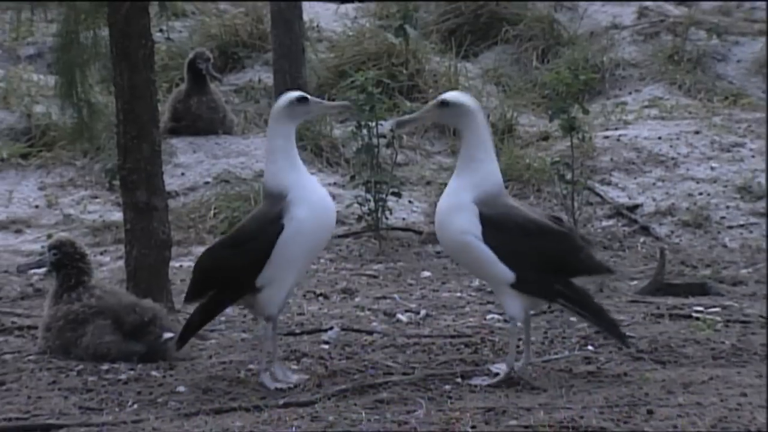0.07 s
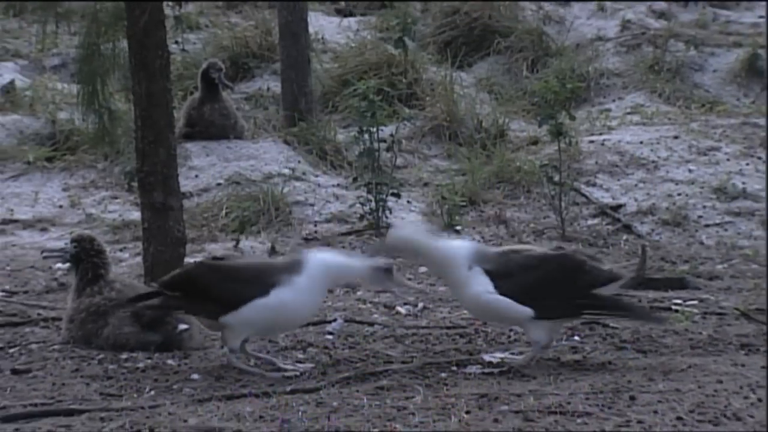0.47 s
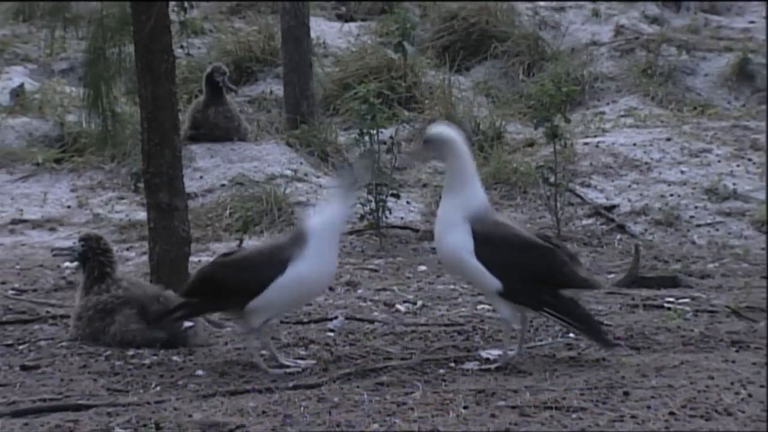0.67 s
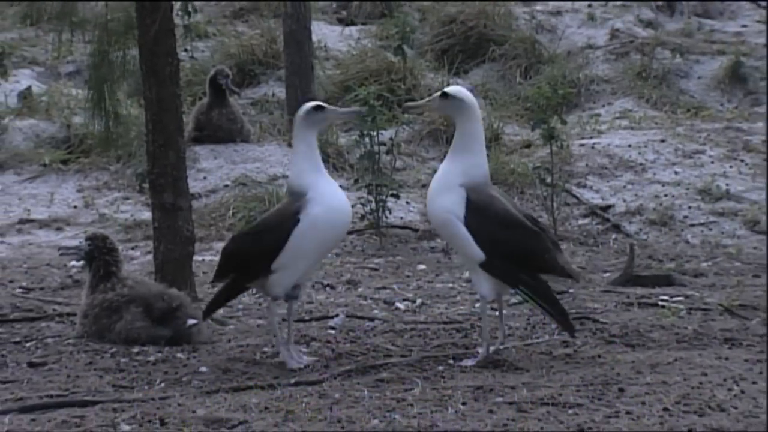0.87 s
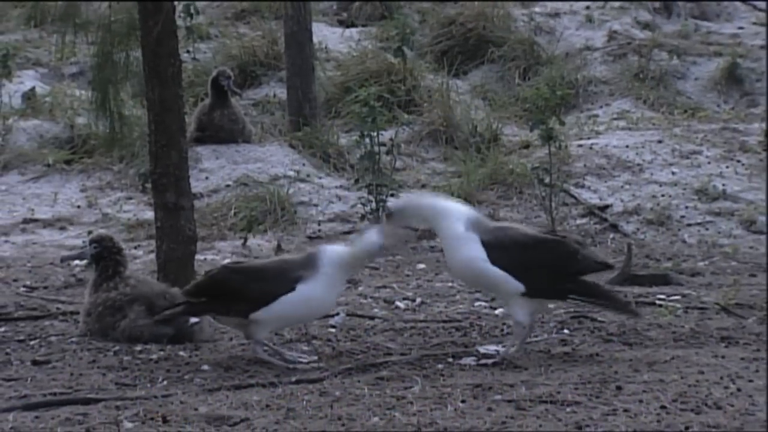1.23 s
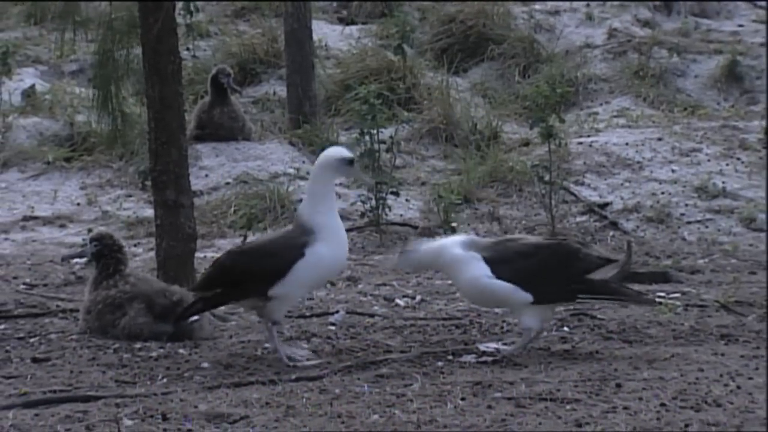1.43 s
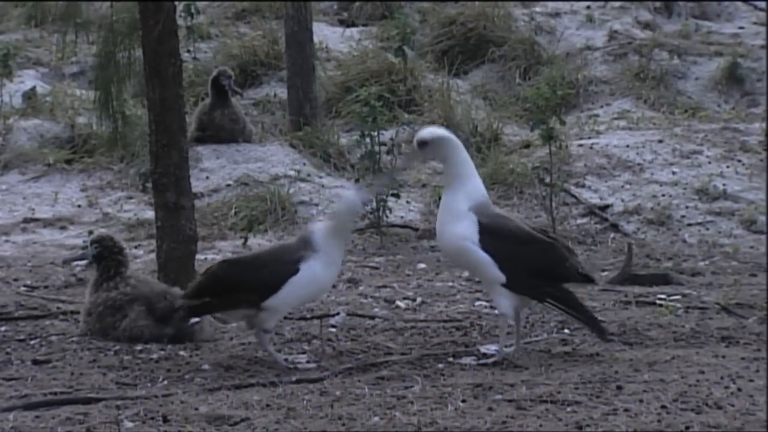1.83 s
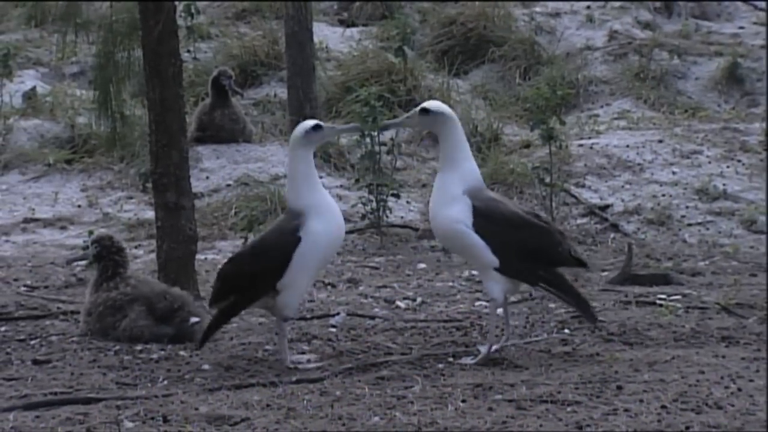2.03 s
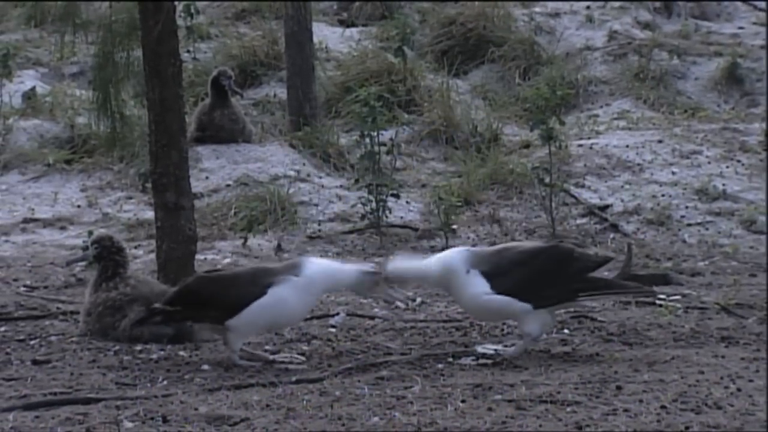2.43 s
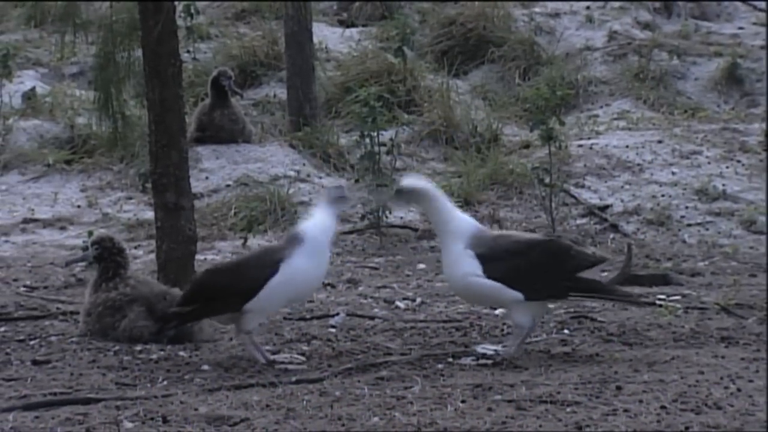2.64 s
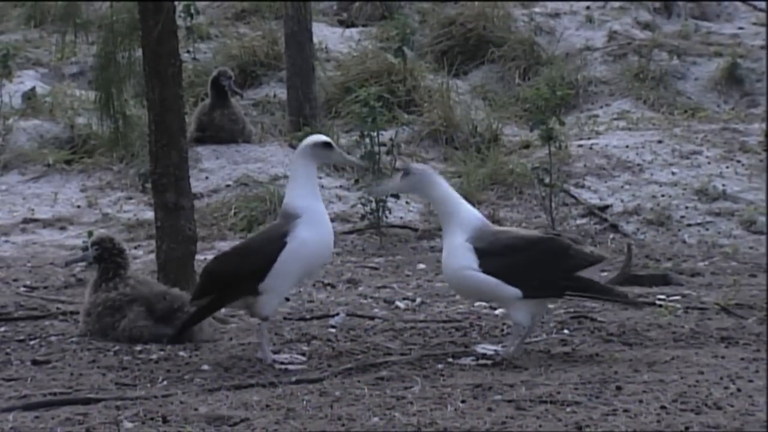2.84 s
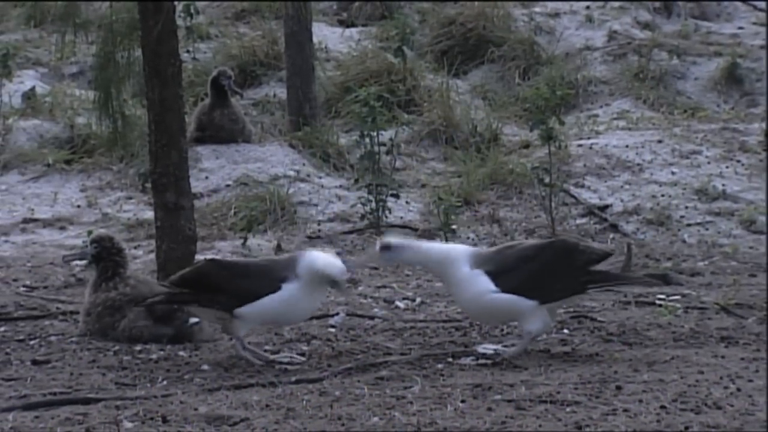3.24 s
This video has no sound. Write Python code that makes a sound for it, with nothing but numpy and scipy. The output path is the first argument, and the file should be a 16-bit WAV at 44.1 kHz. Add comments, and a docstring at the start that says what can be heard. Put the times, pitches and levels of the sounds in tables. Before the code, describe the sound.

Two albatrosses call and clap their bills in quick, hollow runs that recur from 0.2 to 3.2 seconds. One gives a high quavering whinny from 0.4 to 1.9 seconds. The other joins slightly lower at 1.4 and breaks into four short squeals between 2.4 and 2.9. A soft foot thump falls near 1.6. Faint small-bird chirps, distant thin whistles and air hiss lie behind, with a light echo from trees.

```python
"""Sandy ground among trees: two albatrosses dance. One starts a high quavering whinny; the other
joins in lower and ends in separate squeals. Their hollow bills clap in quick runs, each clap a crack,
a shell ring and a cavity pop. A foot thumps the sand. Small birds chirp behind; the trees echo.
Background: thin whistles of the far colony, air hiss, low rumble, a faint electrical whine."""
import sys
import numpy as np
from scipy import signal
from scipy.fft import rfft, irfft
from scipy.io import wavfile

SR = 44100
rng = np.random.default_rng(int(sys.argv[2]) if len(sys.argv) > 2 else 0)


def wrap_up_sound(samples):
    """Save the sound to the file named by the first command line argument, as 16-bit audio."""
    columns = np.atleast_2d(samples).T
    # keep every value between -1 and 1, then stretch to whole-number steps
    tamed = np.clip(columns, -1, 1)
    steps = np.round(tamed * 32767).astype(np.int16)
    wavfile.write(sys.argv[1], SR, steps)


N = 149940
TIME_S = np.arange(N) / SR

# Quavers of each bird: (crest time [s], crest pitch [Hz], crest level [dB],
# next dip pitch [Hz], dip level [dB], roughness [0-1])
HIGH_QUAVERS = [(.434, 3355, -28.5, 3260, -27.5, 0), (.505, 3334, -29, 3262, -42, 0.18),
                (.575, 3474, -30.5, 3305, -30.5, 0.46), (.628, 3492, -32.5, 3430, -34, 0.41),
                (.68, 3480, -30.5, 3410, -25, 0.43), (.733, 3525, -28, 3382, -24, 0.2),
                (.795, 3705, -29.5, 3340, -24.5, 0.29), (.858, 3675, -29.5, 3350, -24.5, 0.3),
                (.921, 3716, -30.5, 3327, -25, 0.11), (.983, 3680, -29.5, 3350, -26, 0.31),
                (1.049, 3594, -28, 3287, -29, 0.26), (1.121, 3570, -28.5, 3224, -35.5, 0.48),
                (1.197, 3555, -36, 3158, -33.5, 0.77), (1.275, 3542, -30, 3231, -38, 0.52),
                (1.355, 3527, -30.5, 3300, -49.5, 0.97), (1.437, 3410, -29.5, 3080, -53.5, 0.79),
                (1.525, 3377, -35, 3090, -58.5, 0.65), (1.612, 3346, -39, 3257, -41.5, 0.71),
                (1.705, 3244, -34.5, 3147, -39.5, 0.52), (1.788, 3363, -34, 3240, -45, 0.26),
                (1.858, 3371, -32, 3200, -32, 0.27)]
LOW_QUAVERS = [(1.44, 2758, -39.5, 2610, -57, 0.34), (1.535, 3230, -32.5, 2683, -44.5, .4),
               (1.627, 3197, -35.5, 2729, -36.5, 0.71), (1.722, 3400, -32, 2845, -30, 0.59),
               (1.812, 3320, -26, 2840, -31, 0.17), (1.89, 3300, -33, 2755, -39.5, 0.36),
               (1.98, 3220, -28.5, 2740, -41, 0.25), (2.072, 3228, -26.5, 2685, -41, .12),
               (2.168, 3235, -26.5, 2780, -39, 0.068), (2.262, 3288, -28.5, 2725, -42, 0.37),
               (2.366, 3077, -28.5, 2734, -47.5, .5)]
# Closing squeals: (start [s], length [s], start pitch [Hz], crest pitch [Hz], end pitch [Hz],
# level [dB], roughness [0-1])
SQUEAL_NOTES = [(2.445, .08, 2805, 3060, 2862, -29.5, 0.34), (2.56, 0.074, 2855, 2940, 2800, -29, 0.02),
                (2.69, 0.065, 2690, 3013, 2650, -35.5, 0.42), (2.859, 0.048, 2700, 2720, 2635, -37.5, 0.03)]
# Overtone strength: (frequency [Hz], level re fundamental [dB])
THROAT_RESPONSE = [(5400, -17.5), (6000, -20.5), (6900, -29), (7500, -32.5), (8600, -52.5), (9500, -47.5),
                   (10100, -30.5), (10700, -31.5), (11400, -45), (12500, -48.5), (13700, -46), (15200, -43)]
# Bill claps: (time [s], cavity pitch [Hz], cavity gain [dB], shell gain [dB], crack gain [dB])
BILL_CLAPS = [(0.0192, 1160, -37.5, -61, -87), (0.2405, 840, -30.5, -32, -54),
              (0.2796, 1230, -35, -58, -75), (0.2862, 740, -29.5, -33.5, -54.5),
              (0.3302, 750, -30.5, -32, -52.5), (0.3736, 700, -32.5, -36.5, -60),
              (0.4101, 926, -36, -31, -56), (0.458, 920, -33.5, -36, -56.5),
              (0.5022, 890, -35.5, -36.5, -59), (0.5451, 790, -42, -38, -64.5),
              (0.5492, 1170, -36, -46, -78), (0.833, 1160, -40, -64, -73),
              (1.0451, 874, -32.5, -40.5, -60.5), (1.0933, 878.4, -32.5, -33.5, -57),
              (1.139, 845, -36, -32, -56), (1.1723, 1098, -42, -64, -73), (1.325, 699, -33.5, -33, -60),
              (1.368, 720, -32, -31, -62), (1.4105, 707, -33, -33.5, -63.5),
              (1.6327, 793, -33.5, -34.5, -53), (1.6778, 772, -33.5, -32, -58.5),
              (1.7203, 792, -35.5, -36.5, -58.5), (2.2294, 827, -30, -32, -60),
              (2.2744, 794, -30.5, -36, -53.5), (2.302, 1060, -35.5, -40, -71),
              (2.3194, 780, -30.5, -36, -53), (2.3488, 727, -36.5, -36, -63), (2.363, 765, -32.5, -39, -56),
              (2.3943, 753, -36, -36.5, -64), (2.407, 843, -46, -71, -75), (2.4359, 743, -38.5, -40.5, -78),
              (2.4787, 766, -39.5, -43.5, -63.5), (2.9108, 1130, -52, -53, -62.5),
              (3.049, 880, -34.5, -36.5, -63), (3.0962, 834, -34.5, -33.5, -56.5),
              (3.141, 810, -36.5, -33.5, -60.5), (3.1837, 780, -39.5, -41, -70)]
# Mouth cavity modes: (multiple of cavity pitch [1], relative level [dB], T60 [s])
CAVITY_MODES = [(0.559, -18.5, .007), (1.002, 23, 0.0082)]
# Horny shell modes: (frequency [Hz], relative level [dB], T60 [s])
SHELL_MODES = [(1607, 0, 0.02), (2070, 13.5, 0.0055), (2476, 9.5, 0.01), (3137, 0, 0.018),
               (3660, 1.5, 0.0094), (4620, -2, 0.0056)]
# Small birds: (start [s], start pitch [Hz], end pitch [Hz], level [dB])
CHIRP_NOTES = [(.07, 5000, 4300, -76), (.2, 5210, 4750, -53), (.28, 5210, 4300, -58),
               (.36, 5160, 4200, -57), (.478, 5070, 4200, -56), (.585, 5350, 4200, -50),
               (.668, 5220, 4200, -59.5), (.845, 5180, 4400, -51.5), (1.11, 5240, 4300, -53),
               (1.249, 5200, 4289, -62), (1.95, 5190, 4170, -62), (2.079, 5180, 4080, -65),
               (2.521, 5480, 4520, -60), (3.065, 7600, 6600, -68.5), (3.285, 8070, 5900, -69.5),
               (3.36, 8650, 6000, -67.5)]
# Far colony: (start [s], length [s], pitch [Hz], level [dB])
COLONY_WHISTLES = [(0, 0.48, 3050, -58.5), (0, 0.33, 3340, -61.5), (0, 0.18, 3620, -64.5),
                   (0.276, .2, 2714, -56.5), (2.847, 0.59, 3055, -61.5), (3.178, 0.12, 2880, -60)]
# Hiss of open air and colony: (frequency [Hz], relative density [dB])
AIR_SPECTRUM = [(35, -52), (60, -14), (276, -21), (438, -15), (816, -12), (960, -12.5), (1180, -14),
                (2420, -29), (2590, -15.5), (3050, -14), (3660, -15.5), (3930, -25), (4310, -12.5),
                (5060, -18), (7160, -35.5), (8820, -40), (15000, -42)]
# Air rumble: (time [s], level [dB])
RUMBLE_ENVELOPE = [(0.0, -70.5), (0.91, -75), (0.94, -62.5), (1.53, -64), (1.6, -52), (1.86, -72),
                   (2.49, -64.5), (2.52, -77.5), (3.4, -69.5)]

ATTACK_S, RELEASE_S, SCATTER_DELAY_S = .006, .018, .00225
HIGH_SUBHARMONIC_DB, LOW_SUBHARMONIC_DB = -35.5, -43


def whinny(quavers, break_share, subharmonic_db, break_at=.74, break_loss_db=4):
    """Pitch and level swing crest to dip; a register break jumps break_share of the swing."""
    crest_s, crest_hz, crest_db, dip_hz, dip_db, rough = np.transpose(quavers)
    index = np.arange(len(crest_s))
    end_s = crest_s[-1] + (crest_s[-1] - crest_s[-2]) / 2
    cycle = np.interp(TIME_S, np.r_[crest_s, end_s], np.r_[index, index[-1] + .5])
    cycle -= .0336 * np.sin(np.pi * cycle) ** 2  # dips fall slightly late
    crest = np.minimum(np.round(cycle), index[-1]).astype(int)
    dip = cycle.astype(int)
    swing = np.sin(np.pi * cycle) ** 2  # 0 at crest, 1 at dip
    period_s = np.interp(TIME_S, crest_s, np.abs(np.gradient(crest_s)))
    arch = .9 * np.maximum(period_s / .076, 1) ** 1.7  # slower quavers, broader crests
    broken = .5 + .5 * np.tanh((swing - break_at + .05 * drift(30)) / .045)
    pitch_swing = (1 - break_share) * swing ** arch + break_share * broken
    level_swing = (1 - break_share) * swing ** 2.4 + break_share * broken
    hz = crest_hz[crest] + (dip_hz[dip] - crest_hz[crest]) * pitch_swing
    db = crest_db[crest] + (dip_db[dip] - crest_db[crest]) * level_swing
    db -= break_loss_db * np.sin(np.pi * broken) ** 2  # voice falters mid-jump
    envelope = gate(TIME_S - crest_s[0], end_s - crest_s[0])
    return voice(hz, db, np.interp(TIME_S, crest_s, rough), subharmonic_db) * envelope


def squeals():
    """The lower whinny slows into single arched notes."""
    out = np.zeros(N)
    for start_s, length_s, start_hz, crest_hz, end_hz, db, rough in SQUEAL_NOTES:
        t = np.arange(int(length_s * SR)) / SR
        glide_hz = start_hz + (end_hz - start_hz) * t / length_s
        arch = np.sin(np.pi * (t / length_s) ** .764) ** 1.67
        hz = glide_hz + (crest_hz - glide_hz) * arch
        add(out, start_s, voice(hz, db, rough, LOW_SUBHARMONIC_DB) * gate(t, length_s))
    return out


def voice(hz, db, rough, subharmonic_db, strain_hz=128, breath_hz=258):
    """Whistle with breathy overtones and a faint subharmonic; strain adds jitter, flutter and rasp."""
    n = len(hz)
    hz = hz * (1 + .015 * rough * drift(strain_hz, n) + .0028 * drift(620, n))
    phase = 2 * np.pi * np.cumsum(hz) / SR
    tone = np.sin(phase)
    for k in range(2, 5):
        breath = drift(breath_hz, n) * np.sin(k * phase) + drift(breath_hz, n) * np.cos(k * phase)
        gain = from_db(spectrum_db(THROAT_RESPONSE, k * hz) + 3 * drift(70, n))
        tone += gain * (np.sin(k * phase) + from_db(-6.5) * np.sqrt(rough) * breath)
    sub_gain = from_db(subharmonic_db + 5.2 * drift(60, n))
    hoarseness = from_db(-18.5) * rough ** 2 * drift(500, n)
    subharmonic = (sub_gain + hoarseness) * np.sin(phase / 2)
    rasp = from_db(-16) * rough ** 2 * drift(1300, n)
    flutter_db = 4 * rough * drift(strain_hz, n)
    return np.sqrt(2) * from_db(db + flutter_db) * (tone * (1 + rasp) + subharmonic)


def bill_claps(crack_t60_s=.0061, scatter_t60_s=.039):
    """The bill snaps shut: a short crack, the shell rings, the mouth cavity pops."""
    out, t = np.zeros(N), np.arange(SR // 25) / SR
    for start_s, cavity_hz, cavity_db, shell_db, crack_db in BILL_CLAPS:
        cavity = sum(ring(t, cavity_hz * ratio, db, t60_s) for ratio, db, t60_s in CAVITY_MODES)
        shell = sum((-1) ** k * ring(t, hz * rng.normal(1, .05), rng.normal(db, 3), t60_s)
                    for k, (hz, db, t60_s) in enumerate(SHELL_MODES))
        crack = rng.standard_normal(len(t)) * from_db(-60 * t / crack_t60_s)
        parts = [(butter(cavity, 390, "high"), cavity_db - 2),
                 (butter(shell, 1300, "high"), shell_db - 1),
                 (butter(crack, [2800, 8800], "band"), crack_db + 6.5)]
        clap = sum(from_db(db) * x / np.linalg.norm(x) for x, db in parts)
        clap *= np.sqrt(.005 * SR)  # levels as RMS over 5 ms
        add(out, start_s, clap)
        # Scatter off ground and bodies; new each clap as the head moves.
        add(out, start_s, from_db(-10) * echoes(clap, scatter_t60_s, SCATTER_DELAY_S))
    return out


def foot_thump(start_s=1.563, t60_s=.17, cutoff_hz=205.2):
    """Dull footfall on sand."""
    t = np.maximum(TIME_S - start_s, 0)
    thud = rms_one(butter(rng.standard_normal(N), cutoff_hz, "low"))
    return thud * from_db(-42.5 - 60 * t / t60_s) * np.minimum(t / ATTACK_S, 1)


def small_birds(length_s=.08):
    """Falling, slightly hoarse chirps with a short echo."""
    out, t = np.zeros(N), np.arange(int(length_s * SR)) / SR
    envelope = gate(t, length_s, attack_s=.01, release_s=.03)
    for start_s, start_hz, end_hz, db in CHIRP_NOTES:
        glide_hz = start_hz + (end_hz - start_hz) * np.sin(np.pi / 2 * t / length_s)
        hz = glide_hz * (1 + .0091 * drift(500, len(t)))
        add(out, start_s, from_db(db) * envelope * sine(hz))
    return out + from_db(-8.5) * echoes(out, t60_s=.2, delay_s=SCATTER_DELAY_S)


def colony(fade_s=.021):
    """Distant albatrosses hold thin wavering whistles."""
    out = np.zeros(N)
    for start_s, length_s, hz, db in COLONY_WHISTLES:
        t = np.arange(int(length_s * SR)) / SR
        whistle = sine(hz * (1 + .0112 * drift(27, len(t))))
        flicker_db = 5 * drift(56, len(t))
        add(out, start_s, from_db(db + flicker_db) * gate(t, length_s, fade_s, fade_s) * whistle)
    return out


def background(hiss_db=-58, rumble_hz=73.5, whine_hz=15735, whine_db=-76):
    """Open-air hiss, low rumble, thin electrical whine."""
    hz = np.maximum(np.fft.rfftfreq(N, 1 / SR), 1)
    hiss = rms_one(irfft(rfft(rng.standard_normal(N)) * from_db(spectrum_db(AIR_SPECTRUM, hz)), N))
    rumble = rms_one(butter(rng.standard_normal(N), rumble_hz, "low"))
    rumble_db = np.interp(TIME_S, *np.transpose(RUMBLE_ENVELOPE))
    whine = sine(np.full(N, whine_hz))
    return from_db(hiss_db) * hiss + from_db(rumble_db) * rumble + from_db(whine_db) * whine


def echoes(x, t60_s, delay_s):
    """Decaying cloud of dull reflections."""
    t = np.arange(int(t60_s * SR)) / SR
    cloud = butter(rng.standard_normal(len(t)), 8900, "low") * from_db(-60 * t / t60_s)
    response = np.r_[np.zeros(int(delay_s * SR)), cloud / np.linalg.norm(cloud)]
    return signal.fftconvolve(x, response)[:N]


def ring(t, hz, db, t60_s):
    """One struck mode."""
    return from_db(db - 60 * t / t60_s) * np.sin(2 * np.pi * hz * t)


def sine(hz):
    """Unit-RMS sine along a pitch track."""
    return np.sqrt(2) * np.sin(2 * np.pi * np.cumsum(hz) / SR)


def drift(hz, size=N):
    """Random wander below hz, RMS about 1."""
    return rms_one(butter(rng.standard_normal(size + SR // 4), hz, "low"))[-size:]


def gate(t, length_s, attack_s=ATTACK_S, release_s=RELEASE_S):
    """Smooth attack, hold, release."""
    ramp = np.clip(np.minimum(t / attack_s, (length_s - t) / release_s), 0, 1)
    return np.sin(np.pi / 2 * ramp) ** 2


def butter(x, hz, kind):
    """Causal Butterworth filter."""
    return signal.sosfilt(signal.butter(2, hz, kind, fs=SR, output="sos"), x)


def spectrum_db(points, hz):
    """Interpolate on a log-frequency axis."""
    point_hz, db = np.transpose(points)
    return np.interp(np.log(hz), np.log(point_hz), db)


def from_db(db):
    """Decibels to gain."""
    return 10 ** (db / 20)


def rms_one(x):
    """Scale to RMS 1."""
    return x / np.sqrt(np.mean(x ** 2) + 1e-20)


def add(out, start_s, x):
    """Mix x in at start_s."""
    i = int(start_s * SR)
    out[i:i + len(x)] += x[:N - i]


def scene():
    """The pair in front; grove echo, other birds and air behind."""
    calls = whinny(HIGH_QUAVERS, break_share=.11, subharmonic_db=HIGH_SUBHARMONIC_DB)
    calls += whinny(LOW_QUAVERS, break_share=.31, subharmonic_db=LOW_SUBHARMONIC_DB)
    calls += squeals()
    bills, chirps = bill_claps(), small_birds()
    to_trees = calls + from_db(-3.5) * bills + from_db(8.5) * chirps
    grove = from_db(-18.5) * echoes(to_trees, t60_s=.76, delay_s=.02)
    return (calls + bills + grove + chirps + colony() + foot_thump() + background())[None]


def record(dry):
    """Steep low-pass: 70 dB down from 16.9 kHz."""
    return signal.sosfilt(signal.cheby2(16, 70, 16900, fs=SR, output="sos"), dry)


dry = scene()
out = record(dry)
wrap_up_sound(out)
```